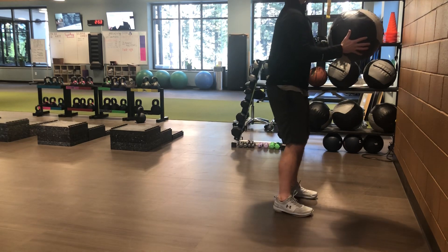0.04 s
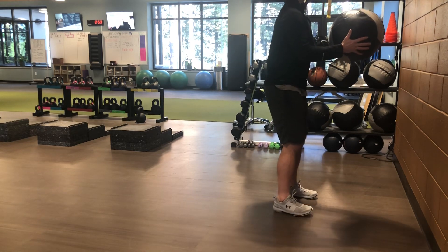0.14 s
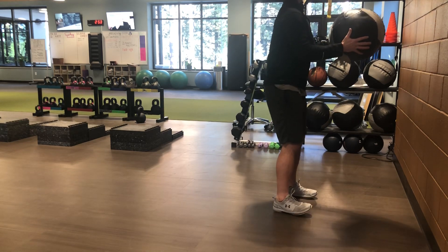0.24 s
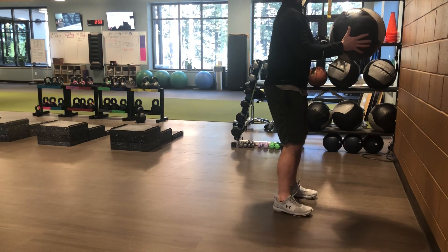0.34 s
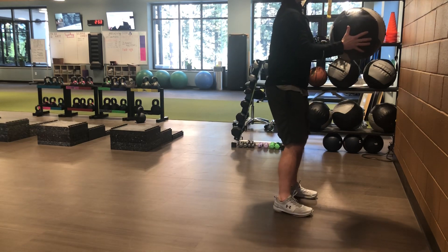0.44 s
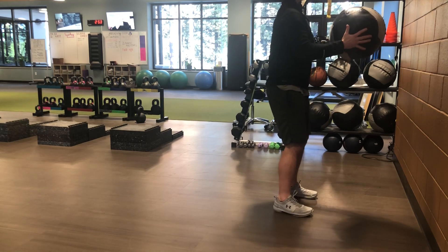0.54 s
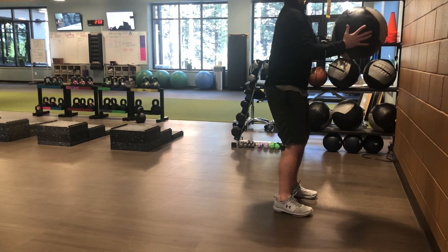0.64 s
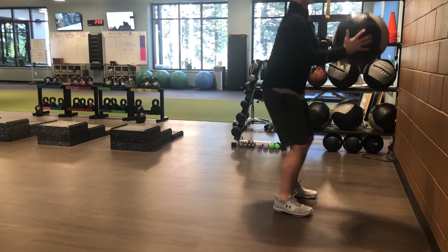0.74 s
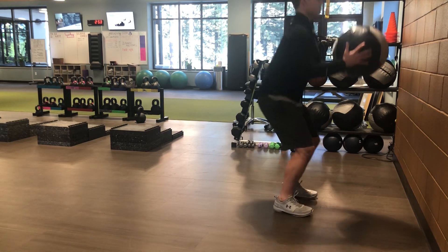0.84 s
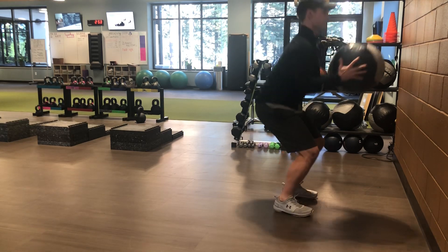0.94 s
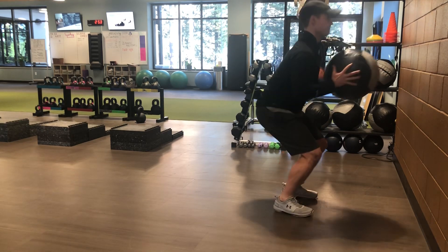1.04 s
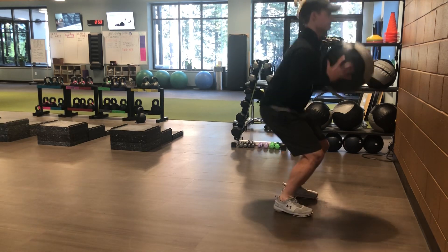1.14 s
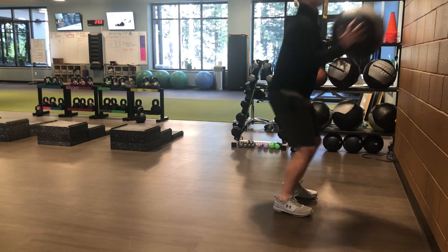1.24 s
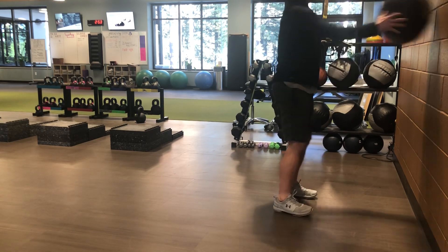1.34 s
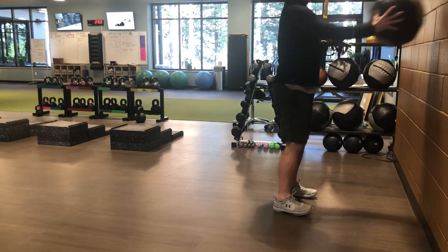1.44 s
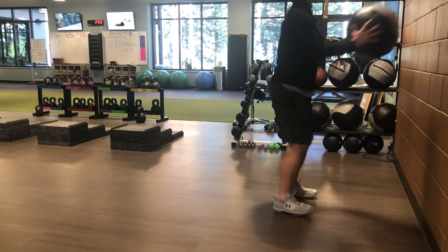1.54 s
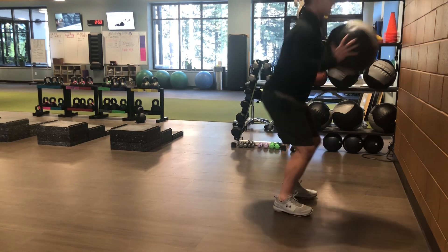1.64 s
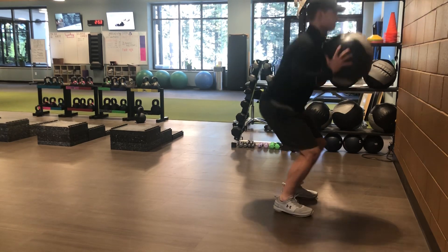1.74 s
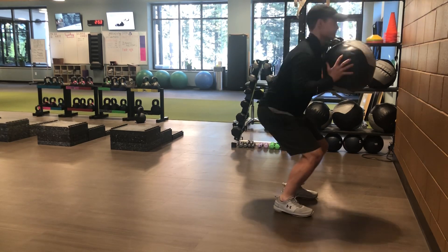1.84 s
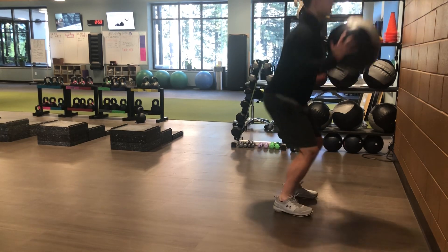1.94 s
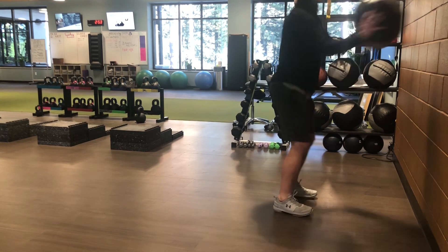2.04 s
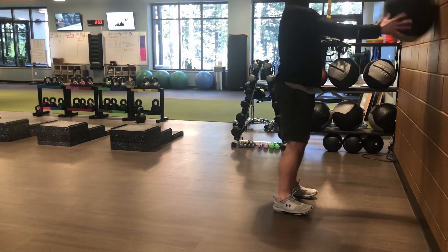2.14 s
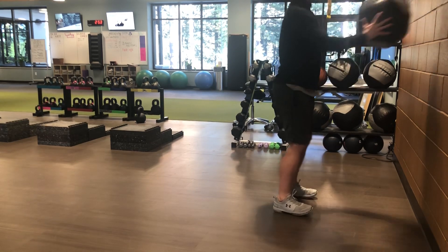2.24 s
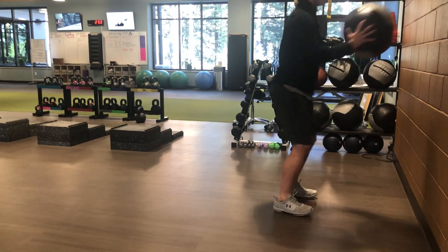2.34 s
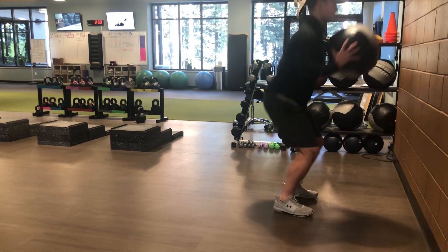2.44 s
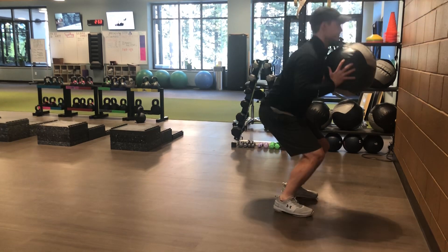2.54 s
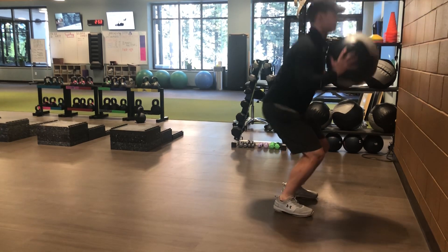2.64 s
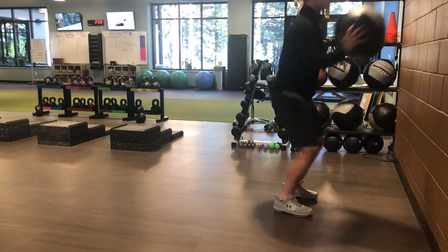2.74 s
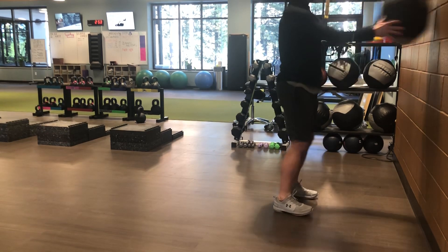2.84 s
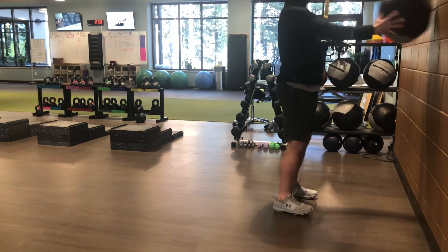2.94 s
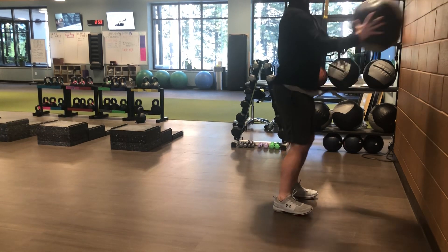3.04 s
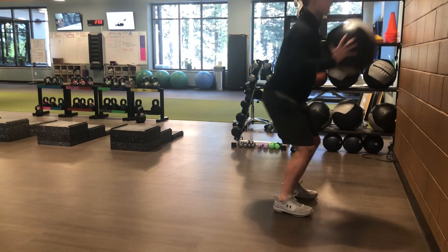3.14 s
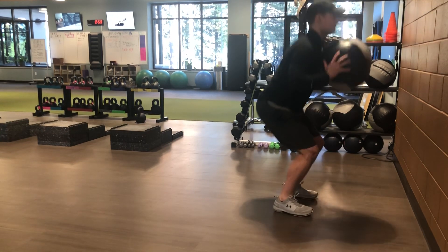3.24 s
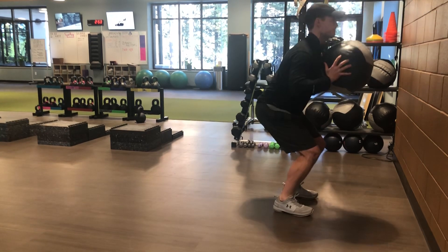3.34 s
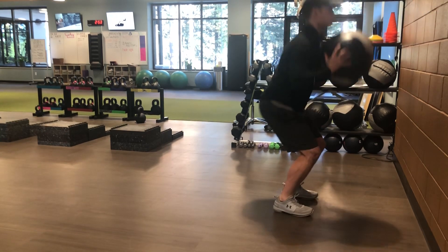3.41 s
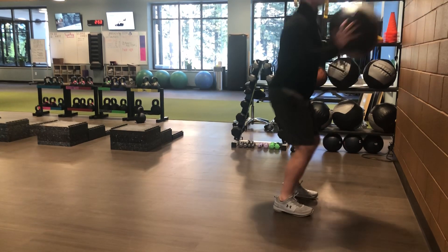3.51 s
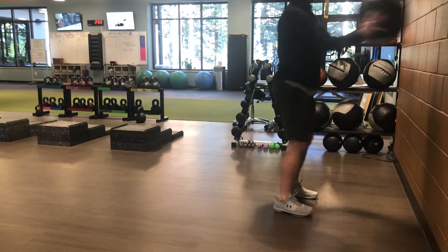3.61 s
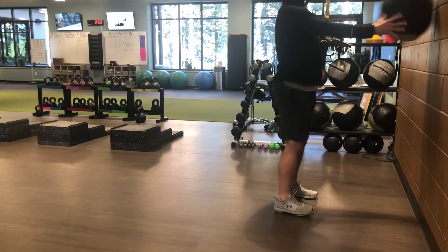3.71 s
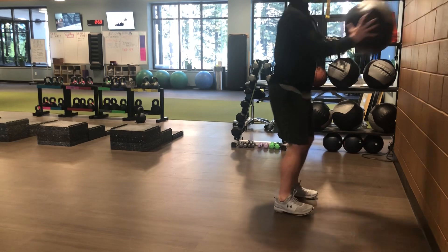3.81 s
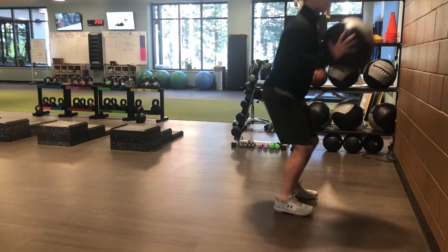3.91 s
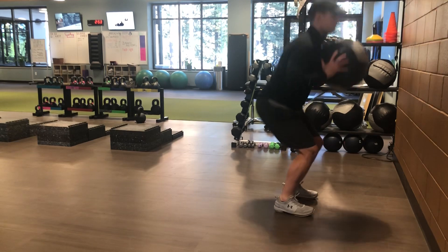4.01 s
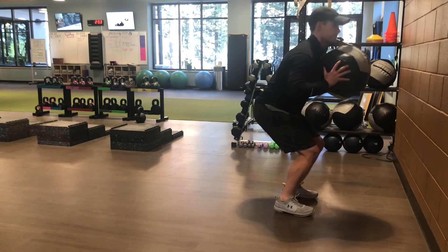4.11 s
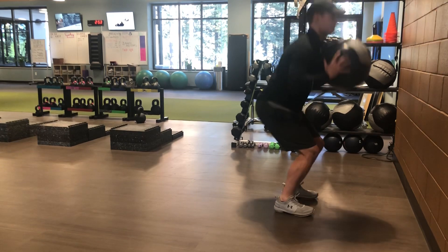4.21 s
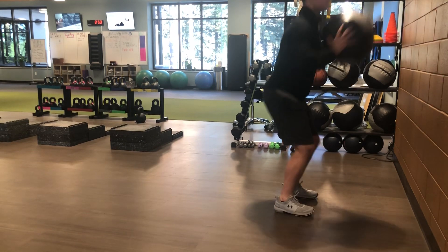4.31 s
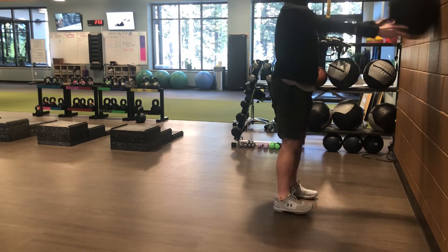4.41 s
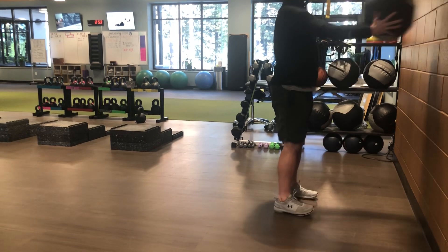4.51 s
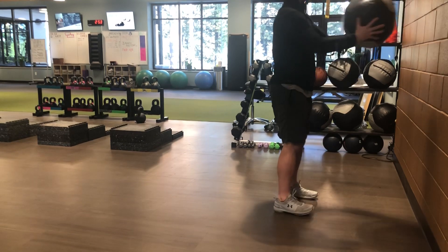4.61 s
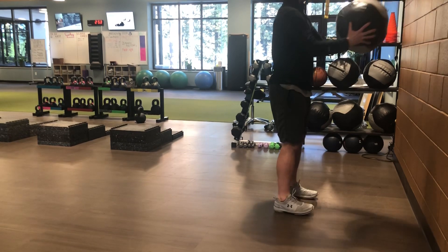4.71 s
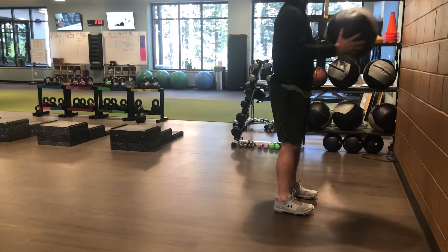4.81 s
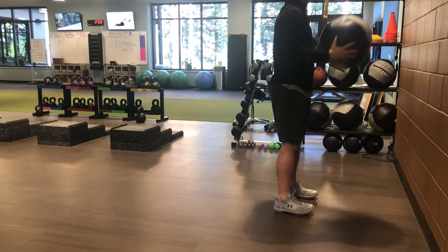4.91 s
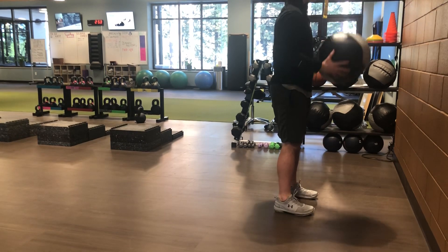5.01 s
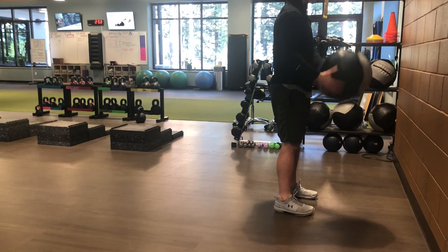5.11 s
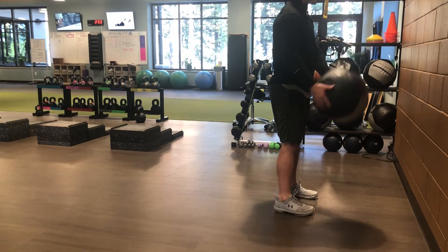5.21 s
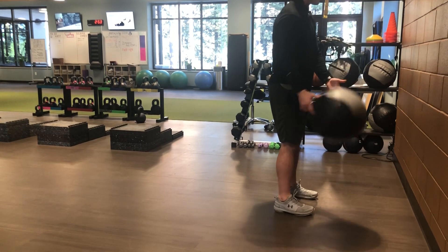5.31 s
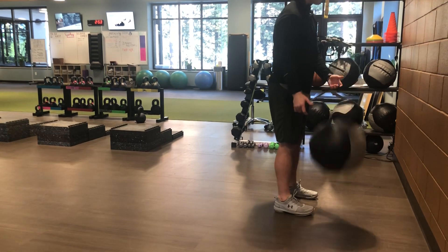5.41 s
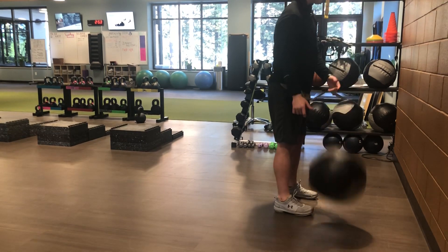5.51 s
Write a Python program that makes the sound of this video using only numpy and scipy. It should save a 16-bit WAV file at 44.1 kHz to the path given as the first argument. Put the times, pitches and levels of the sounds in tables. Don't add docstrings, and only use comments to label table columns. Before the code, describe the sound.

A heavy leather ball smacks a block wall five times in a large gym, each sharp slap with a soft thud and ringing hall echo.

```python
import sys
import numpy as np
from scipy import signal
from scipy.fft import rfft, irfft, next_fast_len
from scipy.io import wavfile
from scipy.ndimage import uniform_filter1d

SR = 44100
rng = np.random.default_rng(int(sys.argv[2]) if len(sys.argv) > 2 else 0)


def dump_mix(stems):
    frames = np.atleast_2d(stems).T
    limited = np.clip(frames, -1, 1)
    pcm = np.round(limited * 32767).astype(np.int16)
    wavfile.write(sys.argv[1], SR, pcm)


def level_to_linear(level):
    exponent = np.asarray(level, float) / 20
    return 10 ** exponent


N = 245195


def unit(x):
    return x / np.sqrt(np.mean(x ** 2) + 1e-20)


def along(points, hz):
    point_hz, value = np.transpose(points)
    return np.interp(np.log(hz + 1), np.log(point_hz + 1), value)


def filtered(x, response):
    size = next_fast_len(len(x) + SR // 2)
    spectrum = rfft(x, size) * response(np.fft.rfftfreq(size, 1 / SR))
    return irfft(spectrum, size)[:len(x)]


def evened(x, size):
    z = rfft(x)
    return irfft(z / uniform_filter1d(np.abs(z), size=size), len(x))


def add(into, start_s, x):
    part = into[round(start_s * SR):][:len(x)]
    part += x[:len(part)]


def resonances(modes):
    def response(hz):
        total = 0
        for k, (mode_hz, width_hz, level_db) in enumerate(modes):
            damping = 1j * hz * width_hz
            total = total + (-1) ** k * level_to_linear(level_db) * damping / (mode_hz ** 2 - hz ** 2 + damping)
        return total
    return response


def burst(rise_ms, t60_ms, size):
    ms = np.arange(size) * 1000 / SR
    return (1 - np.exp(-ms / rise_ms)) * level_to_linear(-60 * ms / t60_ms) * rng.standard_normal(size)


def boom(modes, push_ms):
    shove = np.pad(np.hanning(round(push_ms * SR / 1000)), (0, 16384))
    swing = filtered(shove, resonances(modes))
    return swing / np.abs(swing).max()


def blurred_noise(shape, bins, frames):
    field = uniform_filter1d(rng.standard_normal(shape), size=bins, axis=0)
    return unit(uniform_filter1d(field, size=frames, axis=1))


# hz, level_db (per Hz)
AIR = [(15, -56.5), (25, -22), (42, -8), (68, 0), (100, -2.5), (205, -6.5), (250, -10), (400, -13.5),
       (480, -16.5), (590, -14.5), (1510, -21.5), (2270, -27.5), (3500, -30), (12500, -51.5), (16500, -55)]
# hz, width_hz, level_db
DUCT = [(161.6, 16, -51.5), (748, 40, -57.5), (3210, 74, -70)]
AIR_DB, PATCHY_AIR_DB = -42, 0.96


def ventilation():
    z = signal.stft(rng.standard_normal(N), nperseg=512)[2]
    patches = level_to_linear(PATCHY_AIR_DB * blurred_noise(z.shape, bins=5, frames=10))
    patchy = signal.istft(z * patches, nperseg=512)[1][:N]
    out = level_to_linear(AIR_DB) * unit(filtered(patchy, lambda hz: level_to_linear(along(AIR, hz))))
    for duct_hz, width_hz, level_db in DUCT:
        hum = filtered(rng.standard_normal(N), resonances([(duct_hz, width_hz, 0)]))
        out += level_to_linear(level_db) * unit(hum)
    return out


# peak_s, level_db, half_length_ms, top_hz
RUSTLES = [
    (.44, -80, 40, 12000),
    (.7, -78, 50, 12000),
    (.99, -68, 50, 16000),
    (4.92, -63, 41, 9000),
    (5.04, -71, 50, 11000),
    (5.26, -70, 60, 11000),
    (5.35, -66, 25, 14000),
    (5.51, -64, 34, 9000),
]
# hz, level_db (per Hz)
CLOTH = [(1500, -28), (4000, -4), (7000, -8), (11000, -11), (15500, -3), (20000, -20)]
RELEASE_S, RELEASE_DB, RELEASE_RISE_MS, RELEASE_FALL_MS, RELEASE_HZ = .032, -63.5, 50, 36, 15500


def cloth():
    out = np.zeros(N)
    ms = np.arange(-SR // 5, SR // 5) * 1000 / SR
    swishes = [(s, db, half_ms, half_ms, top_hz) for s, db, half_ms, top_hz in RUSTLES]
    for blow_s, force_db, *_ in THROWS:
        swishes.append((blow_s - RELEASE_S, RELEASE_DB + force_db / 2,
                        RELEASE_RISE_MS, RELEASE_FALL_MS, RELEASE_HZ))
    for peak_s, level_db, rise_ms, fall_ms, top_hz in swishes:
        colour = lambda hz: level_to_linear(along(CLOTH, hz)) / (1 + (hz / top_hz) ** 4)
        fibres = unit(filtered(rng.standard_normal(len(ms)), colour))
        swell = np.exp(-(ms / np.where(ms < 0, rise_ms, fall_ms)) ** 2)
        add(out, peak_s - .2, level_to_linear(level_db) * swell * fibres)
    return out


# start_s, level_db (starting rms),
# tilt_db (brightness per octave)
SNAPS = [(1.4012, -47, -1), (1.4041, -25, -4), (1.4049, -19, -1), (1.4057, -22, 0), (1.4074, -18, -1),
         (1.4083, -24, 1), (1.4218, -25, -4), (2.1565, -3.5, -2), (2.9071, -2, 0), (2.9092, -10, 0),
         (2.9140, -18, 1), (3.6807, -14, 1), (3.6817, -12, 0), (3.6825, -6.5, -1.5), (3.6850, -14, 0),
         (3.6915, -20, 2), (4.4576, -9, .5), (4.4594, -10, -.5), (4.4604, -10, -.5), (4.4624, -6, 1),
         (4.4634, -9.5, -6), (4.4660, -13, 0)]
# hz, level_db
SKIN = [(300, -30), (900, -9), (1500, -3), (2800, 0), (4600, -3), (6200, -1), (8500, -8), (12500, -5),
        (15800, -4), (20000, -30)]
SNAP_MS = 3.73
SIZZLE_DB, SIZZLE_PER_DB = -1.5, -.35
GRAZE_MS, GRAZE_DB = .45, -18


def slaps():
    out = np.zeros(N)
    lead = 64
    start_rms = np.sqrt(SNAP_MS * SR / 1000 / np.log(1e6))
    for start_s, level_db, tilt_db in SNAPS:
        sizzle_db = SIZZLE_DB + SIZZLE_PER_DB * (level_db + 8)

        def colour(hz):
            tilt = tilt_db * np.log2((hz + 300) / 4000)
            return level_to_linear(along(SKIN, hz) + tilt + sizzle_db * (hz > 9000))

        graze = (start_s - GRAZE_MS / 1000, level_db + GRAZE_DB)
        for at_s, at_db in (graze, (start_s, level_db)):
            noise = np.pad(burst(0.1, SNAP_MS, size=960), (lead, 0))
            crack = filtered(evened(noise, size=16), colour)
            add(out, at_s - lead / SR, level_to_linear(at_db) * crack * start_rms / np.linalg.norm(crack))
    return out


# start_s, force_db, thud_db, squash_ms (time to squash), note_hz (fullest note)
THROWS = [
    (1.404, -4, -15.5, 3.4, 247),
    (2.156, 0, -13, 5.1, 495),
    (2.907, 0.5, -11.5, 1, 336),
    (3.682, 0, -13.5, 2.3, 320),
    (4.4584, 1, -8.5, 2.7, 490),
]
# hz, width_hz, level_db
BODY = [(151, 53, 0), (320, 55, -2.5), (403, 135, -5), (767, 126, -8), (943, 51, -0.5), (1350, 67, -1),
        (2070, 100, -10)]
# hz, width_hz, level_db
BOOM = [(49.3, 22, 2), (72, 59, -3.5), (128, 10, 1)]
# hz, width_hz, level_db
SLUMP = [(157.5, 7.4, 4), (193, 14, -5.5)]
SETTLE_MS, SETTLE_PER_SQUASH = 17.6, 11.5
BOOM_DB, BOOM_GROWS = -23, 2.2
SLUMP_S, SLUMP_DB, SLUMP_PER_DOUBLING = 0.01943, -13.5, 2.9


def thuds():
    out = np.zeros(N)
    lead = 256
    for start_s, force_db, thud_db, squash_ms, note_hz in THROWS:
        settle_ms = SETTLE_MS + SETTLE_PER_SQUASH * squash_ms
        push = evened(np.pad(burst(squash_ms, settle_ms, size=7936), (lead, 0)), size=30)
        fullest = resonances([(note_hz, 90, 2)])
        knock = filtered(push, lambda hz: resonances(BODY)(hz) * (1 + fullest(hz)))
        add(out, start_s - lead / SR, level_to_linear(thud_db) * knock / np.abs(knock).max())
        boom_db = BOOM_DB + BOOM_GROWS * force_db
        add(out, start_s + 0.0044, level_to_linear(boom_db) * boom(BOOM, push_ms=10.2))
        slump_db = thud_db + SLUMP_DB + SLUMP_PER_DOUBLING * np.log2(squash_ms / 2)
        add(out, start_s + SLUMP_S, level_to_linear(slump_db) * boom(SLUMP, push_ms=5.2))
    return out


def tail(decays, rise_ms, stretch=1, patchy_db=0):
    hz, t, z = signal.stft(rng.standard_normal(3 * SR // 2), SR, nperseg=256)
    clumps_db = patchy_db * blurred_noise(z.shape, bins=9, frames=4)
    t60_s = stretch * along(decays, hz)[:, None]
    h = signal.istft(z * level_to_linear(clumps_db - 60 * t / t60_s), SR, nperseg=256)[1]
    h = h * (1 - np.exp(-np.arange(len(h)) * 1000 / SR / rise_ms))
    return h / np.linalg.norm(h)


# delay_ms, level_db, top_hz
NEAR = [(2.55, -6.5, 30000), (9.5, -12, 24000), (6.9, -18, 9000), (13.2, -10, 4000), (17.5, -15, 4000),
        (23, -13, 2500), (30, -16, 2500)]
# hz, t60_s
HALL = [(60, 9.1), (160, 1.85), (400, 2.7), (1000, 1.83), (2500, 1.19), (5000, 0.61), (9000, 0.35),
        (15000, 0.28)]
# hz, t60_s
BAY = [(100, 0.39), (1000, 0.42), (10000, 0.12)]
# hz, level_db (per Hz)
SPREAD = [(24, -30), (45, 6), (168, -4), (330, -4), (473, -6.5), (600, -4), (957, -4.5), (1400, -9),
          (3370, -15.5), (6900, -19.5), (7700, -21.5), (12200, -23.5), (15800, -27), (20000, -36)]
# hz, width_hz, level_db
STANDING = [(151.2, 3.7, 15.5), (188, 3.4, 9), (293, 84, 6.5), (828, 17, -3)]
CORNER_MS, HALL_MS = 7, 18
CORNER_DB, HALL_DB = 30.5, 15
STRETCH, STRETCH_PER_DB = 1.22, .025
TILT_DB, TILT_PER_OCTAVE = 0.05, 1.2
BASS_DB, BASS_PER_DOUBLING = 0.3, 1.6


def gym(blows):
    def copies(hz):
        total = 1
        for delay_ms, level_db, top_hz in NEAR:
            delayed = np.exp(-2j * np.pi * hz * delay_ms / 1000)
            total = total + level_to_linear(level_db) * delayed / (1 + 1j * hz / top_hz) ** 2
        return total

    out = filtered(blows, copies)
    lead = 64
    for start_s, force_db, thud_db, squash_ms, note_hz in THROWS:
        corner = tail(BAY, CORNER_MS, patchy_db=1.5)
        corner = filtered(corner, lambda hz: level_to_linear(np.log2((hz + 500) / 4000)))
        hall = tail(HALL, HALL_MS, stretch=STRETCH + STRETCH_PER_DB * force_db, patchy_db=1.6)
        answer = level_to_linear(CORNER_DB + thud_db) * corner + level_to_linear(HALL_DB + force_db) * hall
        tilt_db = TILT_DB + TILT_PER_OCTAVE * np.log2(note_hz / 320)
        bass_db = BASS_DB + BASS_PER_DOUBLING * np.log2(squash_ms / 2)

        def colour(hz):
            slope_db = tilt_db * np.log2((hz + 500) / 2000) + bass_db / (1 + (hz / 250) ** 2)
            return level_to_linear(along(SPREAD, hz) + slope_db) * (1 + np.abs(resonances(STANDING)(hz)))

        level = np.linalg.norm(answer)
        even = evened(np.pad(answer, (lead, SR // 4)), size=60)[:len(answer)]
        add(out, start_s - lead / SR, level * filtered(even, colour))
    return out


# start_s, peak_db, pitch_hz, width_hz, t60_ms
TICKS = [
    (2.5178, -39, 5130, 8000, 9.1),
    (4.422, -46, 6440, 6000, 16),
    (5.505, -65, 7060, 250, 80),
]


def seam_clicks():
    out = np.zeros(N)
    for start_s, peak_db, pitch_hz, width_hz, t60_ms in TICKS:
        seam = resonances([(pitch_hz, width_hz, 0)])
        tick = filtered(burst(.3, t60_ms, size=4096), lambda hz: seam(hz) ** 2 / (1 + 1j * hz / 9000))
        add(out, start_s, level_to_linear(peak_db) * tick / np.abs(tick).max())
    return out


# start_s, peak_db
HEELS = [
    (3.04, -29.5),
    (4.688, -22),
    (4.721, -43),
    (5.091, -47),
]


def heels():
    out = np.zeros(N)
    for start_s, peak_db in HEELS:
        add(out, start_s, level_to_linear(peak_db) * boom(BOOM, push_ms=17))
    return out


def scene():
    background = ventilation() + cloth() + seam_clicks() + heels()
    return (background + gym(slaps() + thuds()))[None]


def roll_off(x):
    return signal.sosfilt(signal.butter(12, 17040, fs=SR, output="sos"), x)


TOP_HZ = 15800


def record(dry):
    heard = filtered(dry[0], lambda hz: (1j * hz / (27 + 1j * hz)) ** 4)
    heard = heard / (1 + np.abs(heard / .95) ** 4) ** (1 / 4)
    kept = filtered(heard, lambda hz: 1 / (1 + np.exp(np.clip((hz - TOP_HZ) / 30, -50, 50))))
    lost = heard - kept
    spill = filtered(lost, lambda hz: level_to_linear(-11 - 0.026 * np.abs(hz - TOP_HZ)))
    sudden = np.clip(uniform_filter1d(np.abs(lost), size=256) / .005 - 1, 0, 1)
    mix = (kept + sudden * spill)[None]
    return roll_off(mix)


dry = scene()
out = record(dry)
dump_mix(out)
```